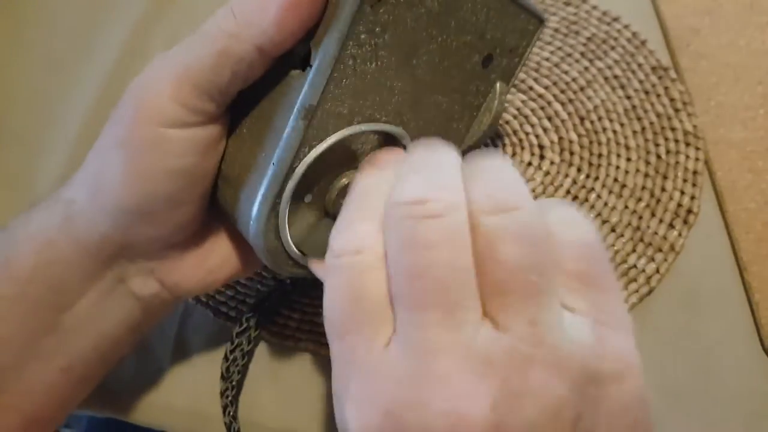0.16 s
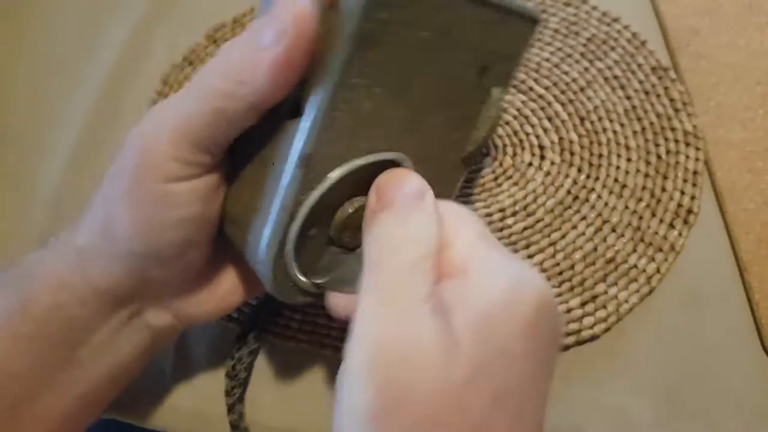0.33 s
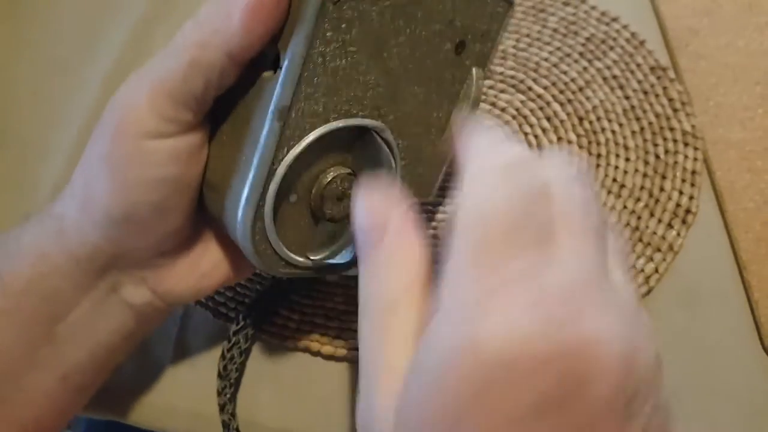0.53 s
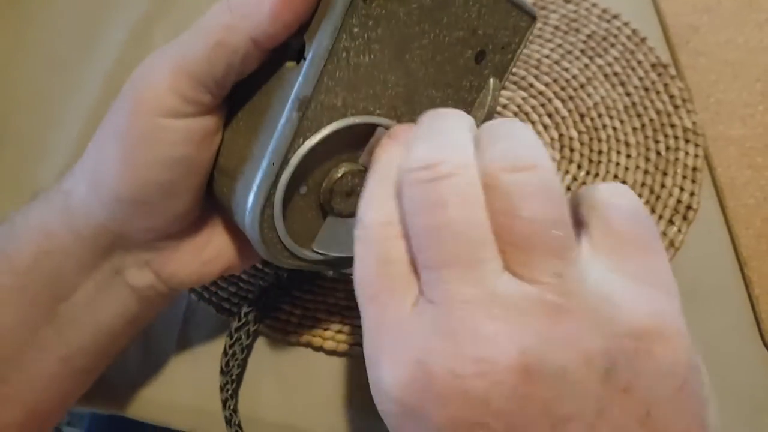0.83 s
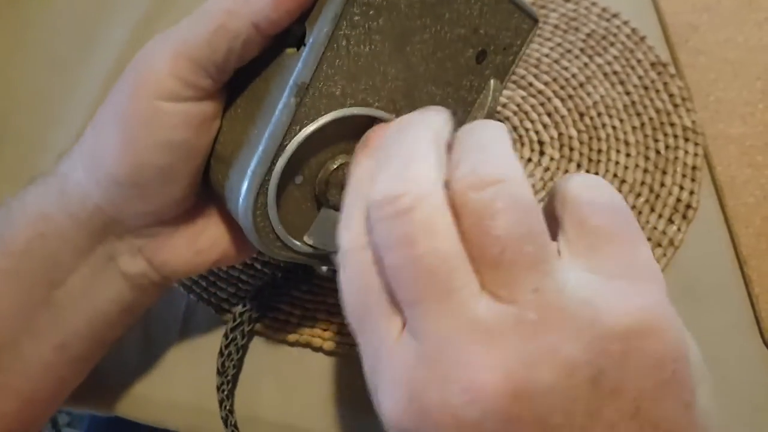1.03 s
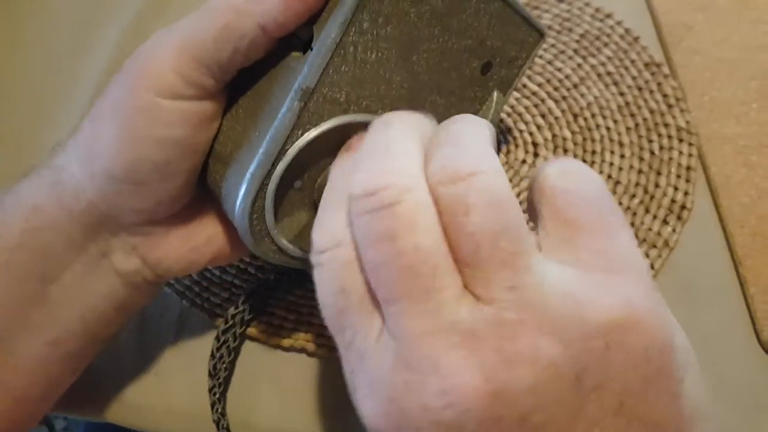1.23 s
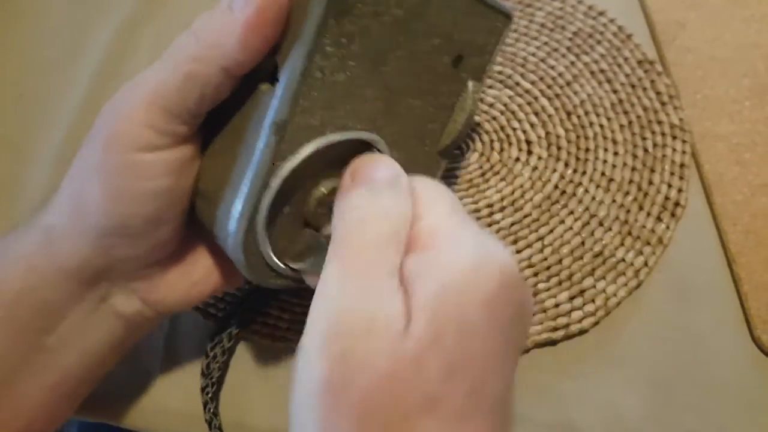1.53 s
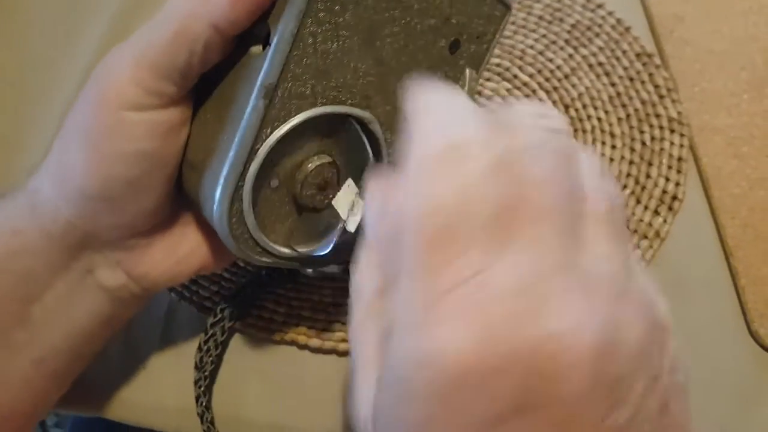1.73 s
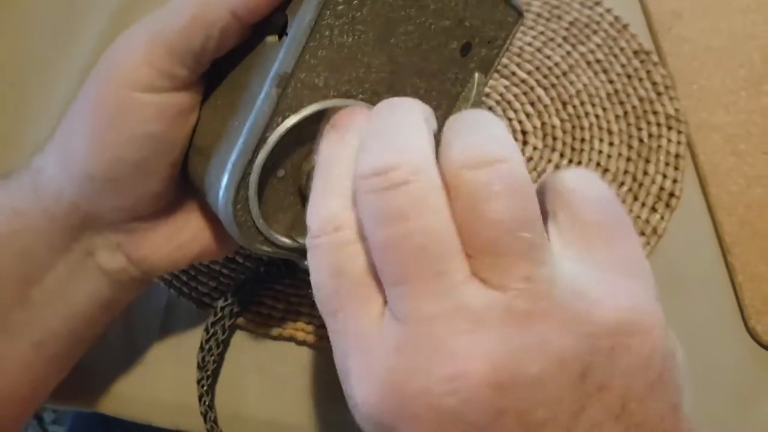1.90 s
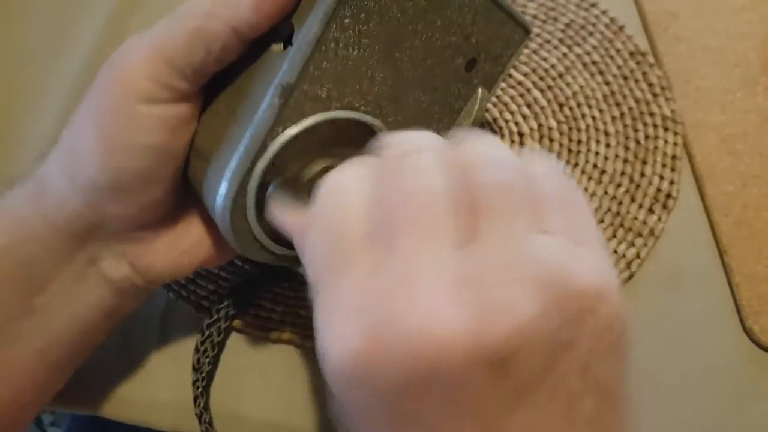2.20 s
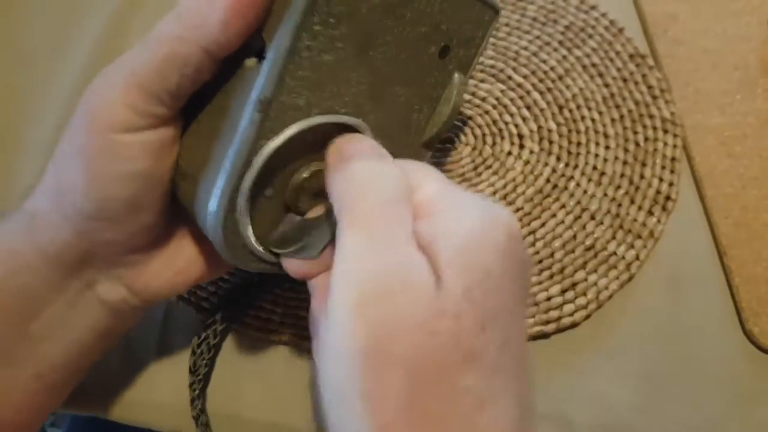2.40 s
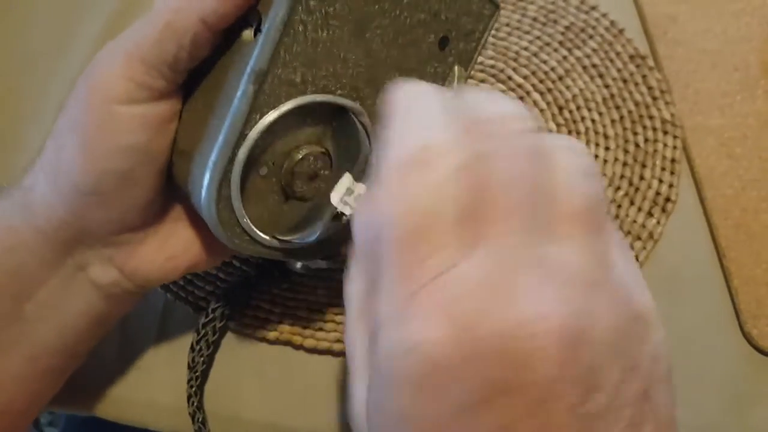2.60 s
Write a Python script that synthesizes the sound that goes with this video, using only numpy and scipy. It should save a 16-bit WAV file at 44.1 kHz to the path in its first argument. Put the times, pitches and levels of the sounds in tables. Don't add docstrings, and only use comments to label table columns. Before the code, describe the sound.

A winding key ratchets a small metal camera's spring in three short, crisp, rattling turns indoors

```python
import sys
import numpy as np
from scipy import signal
from scipy.fft import rfft, irfft
from scipy.io import wavfile
from scipy.ndimage import uniform_filter1d, minimum_filter1d

SR = 44100
rng = np.random.default_rng(int(sys.argv[2]) if len(sys.argv) > 2 else 0)


def store_pcm(level_fs):
    pcm = np.round(np.clip(level_fs, -1, 1) * 32767).astype(np.int16)
    wavfile.write(sys.argv[1], SR, np.atleast_2d(pcm).T)


def level_to_linear(level):
    exponent = np.asarray(level, float) / 20
    return 10 ** exponent


N = 121275

# start [s], level [dB], loudest ring [Hz], treble share [dB], bass
# share [dB].
TURN_1_DROPS = [
    (0.233, -23, 1830, -13, -11.5),
    (0.247, -20.5, 3110, -9, -11.5),
    (0.261, -19.5, 3800, -16, -11),
    (0.2742, -15, 3920, -13, -56),
    (0.2859, -19.5, 4700, -9, -13),
    (0.2981, -18.5, 1700, -22, -43),
    (0.3098, -22.5, 2580, -17.5, -4),
    (0.3233, -19, 4850, -12, -24),
    (0.3446, -20.5, 2720, -20, -14.5),
]
TURN_2_DROPS = [
    (1.3472, -22, 4970, -11.5, -8),
    (1.373, -21, 2680, -12.5, -16),
    (1.3989, -20.5, 5270, -12.5, -10.5),
    (1.4207, -19.5, 1850, -15, -7.5),
    (1.4389, -21.5, 6100, -10, -40),
    (1.4537, -19, 2020, -12.5, -14),
    (1.4682, -18, 2060, -17, -21.5),
    (1.4854, -20.5, 5400, -9.5, -10),
    (1.511, -21.5, 4930, -9, -13),
]
TURN_3_DROPS = [
    (2.1688, -21, 4850, -10.5, -16.5),
    (2.2003, -22, 4900, -16.5, -18.5),
    (2.2273, -21.5, 6400, -13, -13.5),
    (2.2478, -21.5, 3010, -12.5, -8),
    (2.2654, -20, 4000, -13, -11),
    (2.282, -18.5, 3150, -14.5, -17),
    (2.2963, -20.5, 1800, -15, -11),
    (2.313, -21.5, 1900, -13.5, -41),
    (2.3307, -20, 1860, -15, -20),
    (2.359, -20.5, 2140, -14, -12.5),
]
# [s, dB, Hz, dB, dB].
KEY_STOPS = [
    (0.4575, -15, 2500, -23, -10),
    (1.6135, -13, 1100, -29.5, -1.5),
    (2.46, -18, 930, -30.5, -3),
]
# [s, dB, Hz, dB, dB].
KEY_KNOCKS = [(0.204, -35, 1570, -30, -10.5), (0.365, -31, 840, -30, -6), (0.4475, -31.5, 900, -36, -3),
              (0.608, -51.5, 890, -30, 0), (0.8125, -46.5, 895, -33, 5), (0.843, -52, 1270, -36, -8),
              (1.303, -42, 1600, -33, -2), (1.311, -45, 2240, -24, -23), (1.331, -41, 4970, -25, -9),
              (2.113, -35, 1490, -42, -8.5), (2.122, -44, 2270, -27, -23), (2.4475, -41, 920, -32, -7),
              (2.621, -48.5, 2160, -30, -18), (2.6425, -40.5, 2820, -28, -1), (2.647, -43, 4100, -28, -8),
              (2.705, -45.5, 3550, -39, -1.5)]
PAWL_UPPER_DB = [-1.5, -5, 9, 4, -2, 3, 1.5, -4, -1.5, 2.5, 0, 0.5, 1.5, 1.5, 4, 6.5, 3, 5, 6, 1, -1, 3.5,
                 1.5, -0.5, 3, 4, 2.5, -3]
KNOCK_UPPER_DB = [-8, -1, -4, -4, -5, -3, -4, -2, 1.5, -9.5, 2, -7, -3, 14, 0, 0.5]
# one stop, one column per key mode [dB].
STOP_MODE_DB = [
    [1.5, 0.5, 24, -1, -2, 6.5, 4.5, 0, 10, -1.5, 1, -2.5, 7, 10.5],
    [1.5, 3, -4, -1.2, 15.5, 9, -1, -0.5, 11.5, -0.5, 7.5, 7, 1, -11],
    [1.5, 1, 5, 6.5, 3, 10, 5.5, 0, 11.5, 2, 1, -2, 7, -4],
]
# frequency [Hz], level [dB], t60 [s].
PAWL_MODES = [(514, -22.5, 0.083), (923, -15.5, 0.023), (1500, 5.5, 0.0014), (1800, 7.5, 0.01),
              (2132, 6.5, 0.008), (2546, 10.5, 0.017), (3150, 11, 0.0026), (4050, 10, 0.0041),
              (4400, 6.5, 0.0015), (4900, 9.5, 0.006), (5430, 1, 0.018), (6200, 6, 0.0025),
              (768, -18, 0.013), (8580, -7, 0.00098)]
# frequency [Hz], level [dB], t60 [s].
KEY_MODES = [(295, -13.5, 0.0053), (554, -3, 0.027), (874, -26, 0.036), (1100, -0.5, 0.0061),
             (1490, -2.5, 0.011), (1800, 2.5, 0.014), (2100, 6.5, 0.0062), (2560, 9.5, 0.0027),
             (3040, 4.5, 0.0038), (3950, 4, 0.0016), (4440, -1, 0.0032), (5270, -4, 0.016),
             (6470, -10, 0.0044), (489, -12, 0.15)]
# frequency [Hz], level [dB], t60 [s].
TREBLE_MODES = [(11900, -9, 0.001), (10000, -12.5, 0.0014), (12600, 1.5, 0.0014), (12980, -19, 0.002),
                (13700, 9.5, 0.0027), (15230, 8, 0.0017), (14460, 7, 0.0015), (17000, -12, 0.0023)]
# frequency [Hz], left over right [dB].
PORT_LEAN = [(300, 14), (600, 4), (1200, -8), (2600, -1), (5000, 9), (9000, 10.5), (14000, -3)]
# start [s], length [s].
RUB_TIMES = [(.805, .045), (1.86, .07), (1.97, .04), (1.96, .06), (2.615, .045), (2.43, .03), (.438, .022),
             (.31, .08), (.45, .035), (1.605, .035), (2.66, .07)]
# level [dB], centre [Hz].
RUB_BANDS = [(-62, 710), (-75, 4100), (-75, 4500), (-72, 16000), (-57, 3200), (-60.5, 960), (-60, 530),
             (-60, 42), (-58.5, 160), (-58, 85), (-73, 1700)]
# frequency [Hz], t60 [s].
ROOM_T60 = [(300, 0.41), (1000, 0.56), (3000, 0.19), (6000, 0.58), (9000, 0.43), (14000, 1)]
ECHO_DELAYS_S = [.0115, .014, .017, .022]
ECHO_DB = [-15, -23, -13, -48]
# frequency [Hz], density [dB per Hz].
HUSH_SPECTRUM = [(25, -14), (130, -3.5), (260, -10), (1300, -17.5), (5500, -26.5), (9000, -35),
                 (14000, -25), (15800, -29)]
# frequency [Hz], left-right likeness of the hush [0 to 1].
HUSH_ALIKE = [(30, 0.88), (150, 0.54), (1000, 0.05), (4000, 0.033), (12000, 0.017)]
# frequency [Hz], left over right of the hush [dB].
HUSH_PAN = [(60, 4), (240, 4), (950, 1), (3770, 3.5), (15000, 1)]
MASK_EDGES_HZ = [6500, 8500, 10500, 12500, 14500, 17000]

PAWL = dict(modes=PAWL_MODES, contact_s=0.00074, contact_size=0.93, rise_s=0.00016, fall_s=0.0021,
            level_db=-14.5, treble_db=13, bass_db=25.5, pan_db=1.4)
KEY = dict(modes=KEY_MODES, contact_s=0.001408, contact_size=1.5, rise_s=0.00087, fall_s=0.0013,
           level_db=-17.5, treble_db=13.5, bass_db=9.5, pan_db=3.5)
PAWL_UPPER_HZ, KNOCK_UPPER_HZ = 3500, 2500
FAVOUR_DB, FAVOUR_OCT, SCATTER_DB = 4.5, 0.15, 2
BASS_BELOW_HZ, TREBLE_ABOVE_HZ, THIN_HZ = 1450, 9600, 380
TREBLE_FADE_S = 0.005
SHARED, ALIKE_BELOW_HZ = 0.36, 5540
LEAD_SAMPLES, WALL_SHADE = 7, 0.48
RUB_SPREAD = 1.45
ROOM_DB, ROOM_CUT_HZ, ROOM_START_S, ECHO_SMEAR_S = -12, 6800, 0.009, 0.002
HUSH_DB, HUSH_TOP_HZ = -66, 15900
PORT_DIP_HZ, PORT_DIP_WIDTH_HZ, PORT_DIP_SHARE = 8960, 12000, 0.46
TOP_HZ, OFFSET = 16600, -0.0005
MASK_REACH_S, MASK_SMOOTH_S, MASK_BLOCK = 0.010, 0.003, 256
MASK_BELOW_DB, MASK_DEPTH_DB, MASK_PATCHY_DB = 27, -22, 14


def at_hz(points, hz):
    p = np.array(points)
    return np.interp(np.log(np.maximum(hz, 1)), np.log(np.maximum(p[:, 0], 1)), p[:, 1])


def sides(db):
    return level_to_linear(np.array([[db / 2], [-db / 2]]))


def band_pass(x, low_hz, high_hz, order=2):
    return signal.sosfilt(signal.butter(order, [low_hz, high_hz], "band", fs=SR, output="sos"), x)


def ring(x, hz, t60):
    r, w = level_to_linear(-60 / (t60 * SR)), 2 * np.pi * hz / SR
    return signal.lfilter([0, np.sin(w)], [1, -2 * r * np.cos(w), r * r], x + 1e-18)


def upper(modes, above_hz, levels_db):
    return np.outer(levels_db, np.array(modes)[:, 0] > above_hz)


def strikes(events, shades_db, modes, contact_s, contact_size, rise_s, fall_s,
            level_db, treble_db, bass_db, pan_db):
    size = 1600
    out, t = np.zeros((5, N + SR)), np.arange(size) / SR
    shape = (1 - np.exp(-t / rise_s)) ** 2 * np.exp(-t / fall_s)
    ports = np.array([[1], [1], [0], [0], [0]])
    for (s, db, favoured_hz, bright_db, deep_db), shade_db in zip(events, shades_db):
        grains = rng.standard_normal((6, size)) * np.sqrt(np.abs(rng.standard_normal(size))) * shape
        luck_db = SCATTER_DB * rng.standard_normal(24)
        luck_db[:len(modes)] += shade_db
        blow = 0
        for k, (hz, mode_db, t60) in enumerate(modes + TREBLE_MODES):
            treble = hz > TREBLE_ABOVE_HZ
            mode_db += treble * (bright_db + treble_db) + (hz < BASS_BELOW_HZ) * (deep_db + bass_db)
            favour_db = FAVOUR_DB * np.exp(-(np.log2(hz / favoured_hz) / FAVOUR_OCT) ** 2)
            to_ports = level_to_linear(favour_db + luck_db[k]) * sides(at_hz(PORT_LEAN, hz) + pan_db)
            to_walls = np.full((3, 1), level_to_linear(WALL_SHADE * luck_db[k]))
            shared = ports * (1 - (1 - SHARED) * min(hz / ALIKE_BELOW_HZ, 1))
            chatter = np.sqrt(shared) * grains[0] + np.sqrt(1 - shared) * grains[1:]
            chatter[:, int(contact_s * SR)] += contact_size
            chatter = chatter * np.exp(-t * treble / TREBLE_FADE_S)
            edges_hz = [hz / 1.3, min(hz * 1.3, 17000)]
            near = signal.lfilter(*signal.butter(1, edges_hz, "band", fs=SR), chatter)
            rung = ring(near, hz, t60)
            rung = rung / rung.std(axis=1, keepdims=True)
            blow = blow + (-1) ** k * level_to_linear(mode_db) * np.vstack([to_ports, to_walls]) * rung
        blow = blow / blow[:2].std() * level_to_linear(db + level_db)
        i = int(s * SR)
        out[:, i:i + size] += np.vstack([blow[0], np.roll(blow[1], LEAD_SAMPLES), blow[2:]])
    return signal.sosfilt(signal.butter(2, THIN_HZ, "high", fs=SR, output="sos"), out[:, :N])


def ratchet():
    drops = TURN_1_DROPS + TURN_2_DROPS + TURN_3_DROPS
    return strikes(drops, upper(PAWL_MODES, PAWL_UPPER_HZ, PAWL_UPPER_DB), **PAWL)


def key_stops():
    return strikes(KEY_STOPS, STOP_MODE_DB, **KEY)


def key_knocks():
    return strikes(KEY_KNOCKS, upper(KEY_MODES, KNOCK_UPPER_HZ, KNOCK_UPPER_DB), **KEY)


def rubs():
    out, t = np.zeros((2, N)), np.arange(N) / SR
    for (s, length), (db, hz) in zip(RUB_TIMES, RUB_BANDS):
        grains = rng.standard_normal(N) + 0.5 * rng.standard_normal((2, N))
        grains = grains * rng.exponential(1, N)
        band = band_pass(grains, hz / RUB_SPREAD, min(hz * RUB_SPREAD, 15800))
        swell = np.sin(np.pi * np.clip((t - s) / length, 0, 1)) ** 2
        out += level_to_linear(db) * sides(at_hz(PORT_LEAN, hz)) * band / band.std() * swell
    return out


def unit_energy(x):
    return x / np.sqrt((x ** 2).sum(axis=1, keepdims=True))


def room(x):
    t = np.arange(int(0.7 * SR)) / SR
    tail, edges_hz = 0, 200 * 2 ** np.arange(0, 6.6, 0.8)
    for low, high in zip(edges_hz, edges_hz[1:]):
        band = band_pass(rng.standard_normal((2, len(t))), low, high)
        tail = tail + band * level_to_linear(-60 * t / at_hz(ROOM_T60, np.sqrt(low * high)))
    tail = level_to_linear(ROOM_DB) * unit_energy(tail * np.clip((t - ROOM_START_S) / 0.012, 0, 1))
    for lag, db in zip(ECHO_DELAYS_S, ECHO_DB):
        puff = rng.standard_normal((2, len(t))) * np.exp(-np.abs(t - lag) / ECHO_SMEAR_S * 2)
        tail = tail + level_to_linear(db) * unit_energy(puff)
    tail = signal.lfilter(*signal.butter(3, ROOM_CUT_HZ, fs=SR), tail)
    return signal.fftconvolve(x, tail, axes=1)[:, :N]


def hush():
    hz = np.arange(N // 2 + 1) * SR / N
    mid, side = rfft(rng.standard_normal((2, N)))
    alike = np.clip(at_hz(HUSH_ALIKE, hz), 0, 1)
    pan = level_to_linear(np.outer([0.5, -0.5], at_hz(HUSH_PAN, hz)))
    pair = np.sqrt(1 + alike) * mid + np.sqrt(1 - alike) * side * [[1], [-1]]
    out = irfft((hz < HUSH_TOP_HZ) * pan * level_to_linear(at_hz(HUSH_SPECTRUM, hz)) * pair, N)
    return level_to_linear(HUSH_DB) * out / out.mean(axis=0).std()


def scene():
    camera = ratchet() + key_stops() + key_knocks()
    skin = rubs()
    reflected = sum(room(way[None] + skin) for way in camera[2:]) / np.sqrt(3)
    return camera[:2] + skin + reflected + hush()


def mask(x):
    bands = np.array([signal.sosfiltfilt(signal.butter(3, edge, "band", fs=SR, output="sos"), x)
                      for edge in zip(MASK_EDGES_HZ, MASK_EDGES_HZ[1:])])
    power = np.abs(uniform_filter1d(bands ** 2, size=int(MASK_SMOOTH_S * SR)))
    level_db = 10 * np.log10(power + 1e-14)
    loudest_db = -minimum_filter1d(-level_db.max(axis=0), size=int(2 * MASK_REACH_S * SR))
    spared = rng.random((len(bands), 1, N // MASK_BLOCK + 1)) ** 2
    spared = np.repeat(spared, MASK_BLOCK, axis=2)[..., :N]
    under_db = loudest_db - level_db - MASK_PATCHY_DB * spared
    gain = level_to_linear(MASK_DEPTH_DB * np.clip((under_db - MASK_BELOW_DB) / 2, 0, 1))
    return x - (bands * (1 - uniform_filter1d(gain, size=44))).sum(axis=0)


def roll_off(x):
    return signal.sosfilt(signal.butter(12, 16970, fs=SR, output="sos"), x)


def record(dry):
    dip = signal.lfilter(*signal.iirpeak(PORT_DIP_HZ, PORT_DIP_HZ / PORT_DIP_WIDTH_HZ, fs=SR), dry)
    top_cut = signal.cheby2(10, 60, TOP_HZ * 1.04, fs=SR, output="sos")
    cut = signal.sosfilt(top_cut, dry - PORT_DIP_SHARE * dip)
    return roll_off(mask(cut) + OFFSET)


dry = scene()
out = record(dry)
store_pcm(out)
```